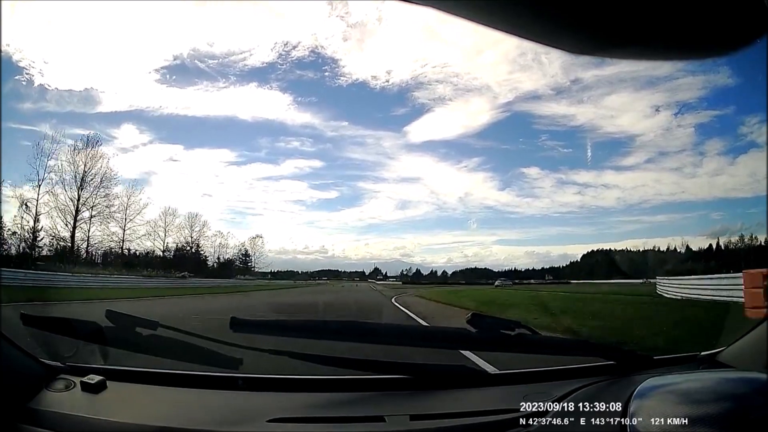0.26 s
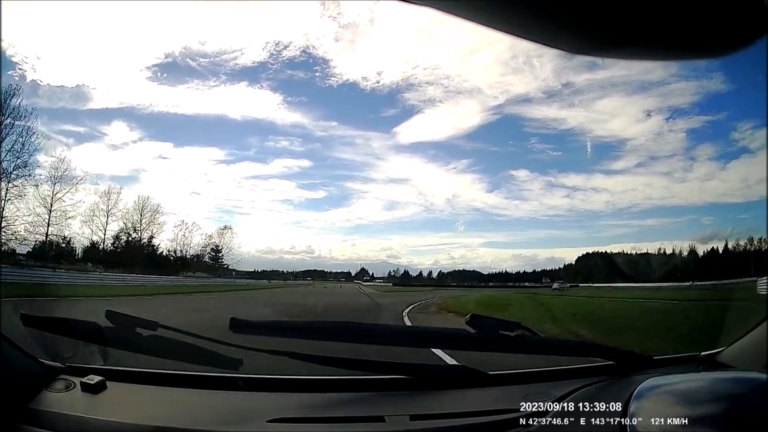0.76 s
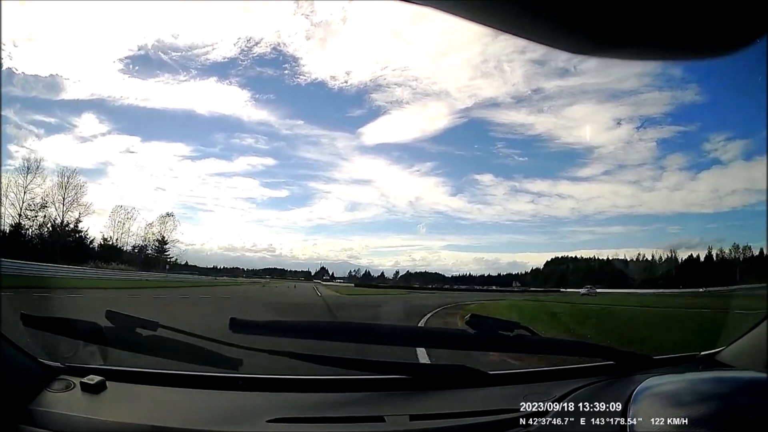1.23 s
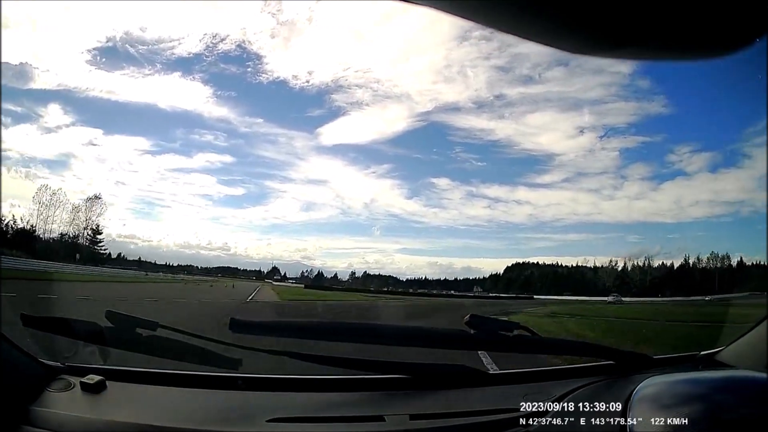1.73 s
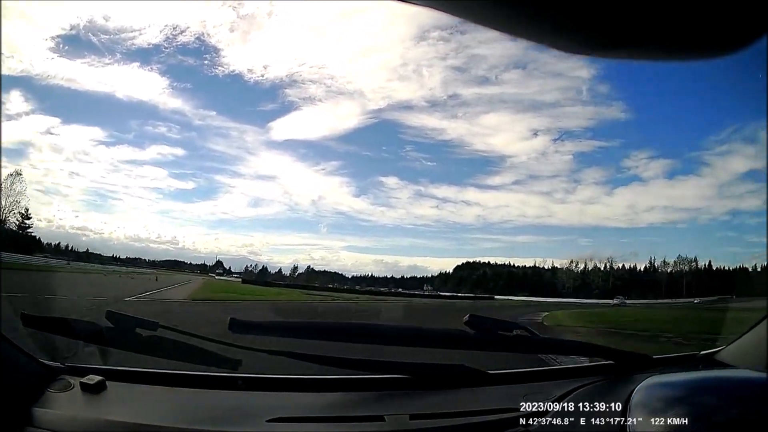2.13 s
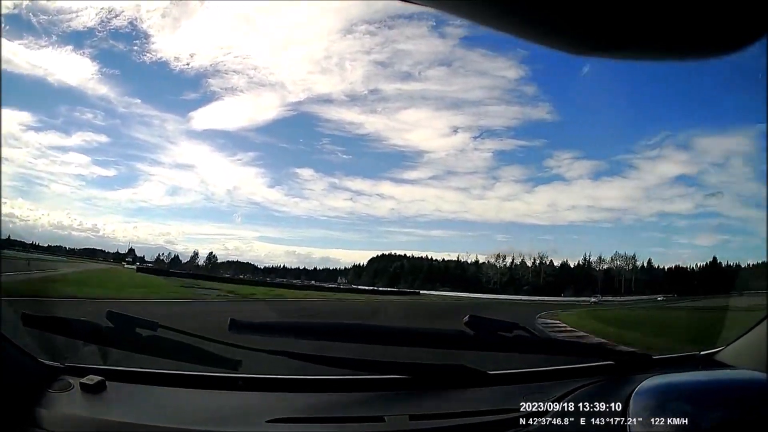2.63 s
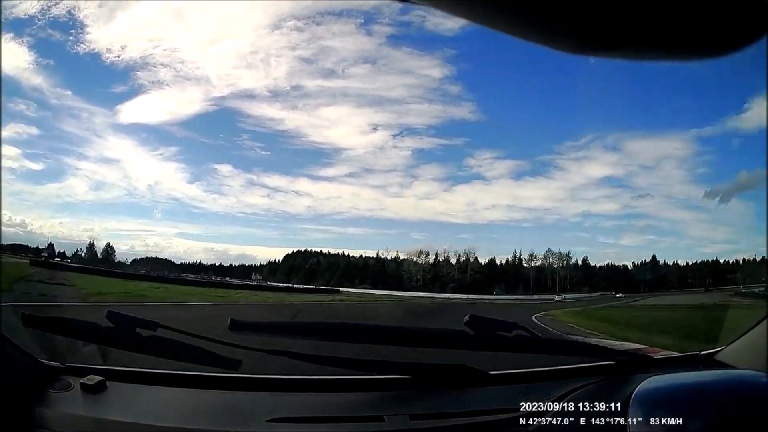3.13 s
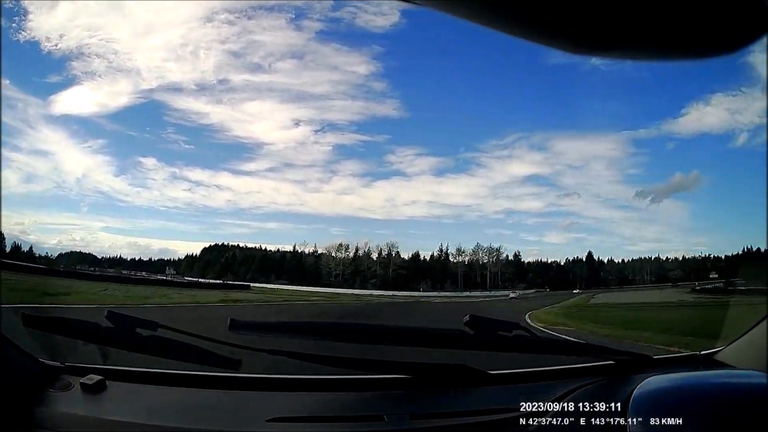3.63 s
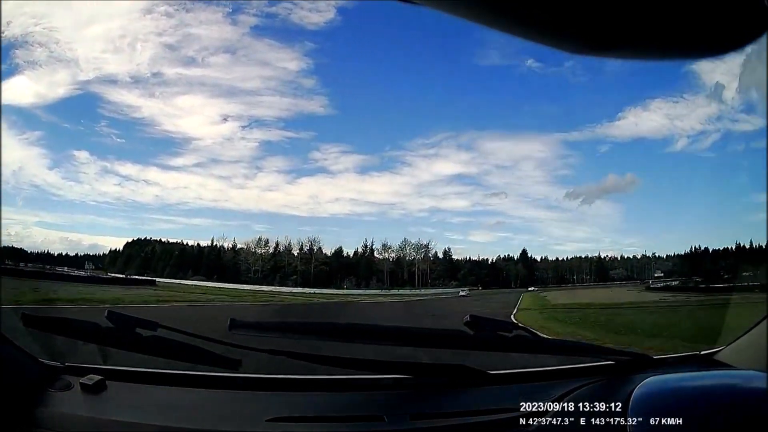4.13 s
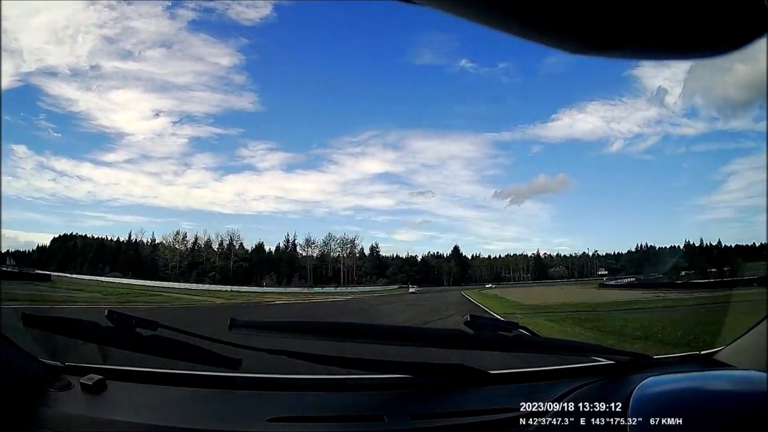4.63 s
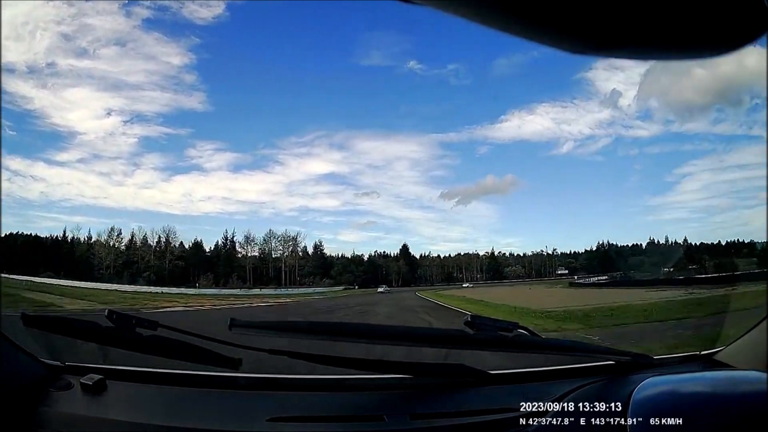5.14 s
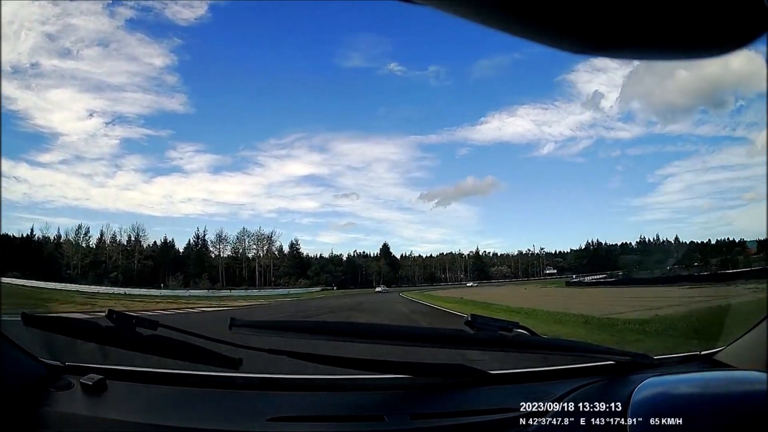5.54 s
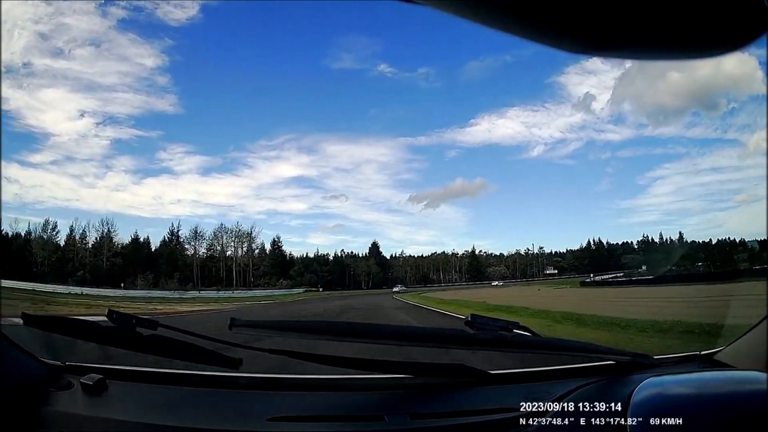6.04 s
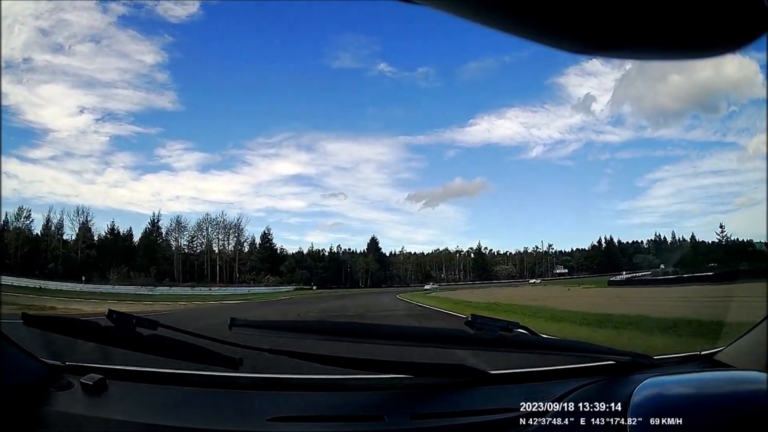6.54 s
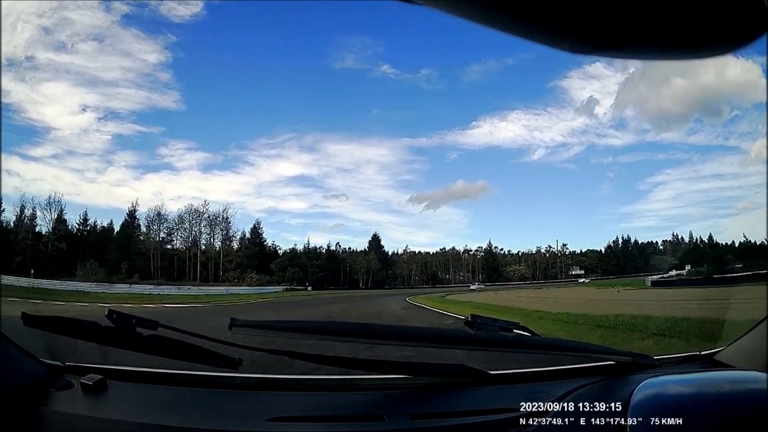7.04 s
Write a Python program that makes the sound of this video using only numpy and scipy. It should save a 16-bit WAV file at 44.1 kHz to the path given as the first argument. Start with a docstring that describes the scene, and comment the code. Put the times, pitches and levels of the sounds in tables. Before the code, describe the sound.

Heavy road rumble and rattling plastic shake a car cabin while an indicator ticks, then a four-cylinder engine growls and climbs smoothly under throttle.

```python
"""Car braking into a bend

Inside a four-cylinder car on rough tarmac as it brakes into a bend and pulls away, heard by a dash camera's microphone.
Bumps boom, the tyres drone and hiss, trim rattles and loose things knock: shaped noise, decaying blows and rung modes.
Engine orders, sines on the crankshaft, rise through body resonances; a gear whines, the indicator relay ticks.
The camera clips, and its crude rate conversion mirrors the bass into the treble."""
import sys
import numpy as np
from scipy.fft import rfft, irfft, next_fast_len
from scipy.io import wavfile
from scipy.ndimage import map_coordinates

SR = 44100
rng = np.random.default_rng(int(sys.argv[2]) if len(sys.argv) > 2 else 0)


def dump_mix(stems):
    """Bounce the given channels to the path in sys.argv[1] as a 16-bit WAV at rate SR."""
    frames = np.atleast_2d(stems).T  # one column per channel
    limited = np.clip(frames, -1, 1)  # hard clip at full scale
    pcm = np.round(limited * 32767).astype(np.int16)
    wavfile.write(sys.argv[1], SR, pcm)


N = 321048


def amp(db):
    """Gain of a level in dB."""
    return 10 ** (np.asarray(db) / 20)


def unit(x):
    """Scaled to rms 1."""
    return x / np.sqrt(np.mean(x ** 2) + 1e-20)


def curves(rows):
    """One value per sample for each column after the time."""
    s, *cols = np.transpose(rows)
    return [np.interp(np.arange(N) / SR, s, c) for c in cols]


def fade(rows, seconds):
    """Gain 1 over the time span of a table, falling to 0 outside it."""
    t = np.arange(N) / SR
    return np.clip(np.minimum(t - rows[0][0], rows[-1][0] - t) / seconds + 1, 0, 1)


def wobble(rate):
    """A smooth random curve, rate knots a second."""
    knots = rng.standard_normal(int(N * rate / SR) + 4)
    return map_coordinates(knots, [np.arange(N) * rate / SR])


def filtered(x, response):
    """x times a complex response of frequency, with half a second of padding."""
    m = next_fast_len(N + SR // 2)
    return irfft(rfft(x, m) * response(np.fft.rfftfreq(m, 1 / SR)), m)[:N]


def resonances(modes):
    """Causal response of (f/Hz, width/Hz, gain/dB) modes, alternating in sign."""
    def response(f):
        return sum((-1) ** k * amp(db) * 1j * f * w / (c * c - f * f + 1j * f * w)
                   for k, (c, w, db) in enumerate(modes))
    return response


def noise(spectrum):
    """Noise of rms 1 coloured by (f/Hz, level/dB) points on a log-frequency axis."""
    f, db = np.transpose(spectrum)
    colour = lambda hz: amp(np.interp(np.log(hz + 1), np.log(f + 1), db))
    return unit(filtered(rng.standard_normal(N), colour))


def resonant_noise(modes):
    """Noise of rms 1 through modes applied twice, for steep skirts."""
    return unit(filtered(rng.standard_normal(N), lambda f: resonances(modes)(f) ** 2))


def glide(rows, flutter_db, rate):
    """A gliding, fluttering sine from rows (t/s, f/Hz, level/dB)."""
    hz, db = curves(rows)
    level = fade(rows, 0.048) * np.sqrt(2) * amp(db + flutter_db * wobble(rate))
    return level * np.sin(2 * np.pi * np.cumsum(hz) / SR)


def ringing(s, gains_db, hz, t60):
    """Damped modes struck at time s, with a soft onset."""
    out, t = np.zeros(N + SR), np.arange(SR // 8)[:, None] / SR
    rings = amp(gains_db - 60 * t / t60) * np.sin(2 * np.pi * hz * t) * (1 - np.exp(-t / 0.00057))
    out[round(s * SR):][:len(t)] = rings.sum(1)
    return out[:N]


def engine():
    """Sines on the crankshaft follow the load and cross body and cabin resonances; valve gear ticks per firing."""
    # throttle: t/s, level/dB under full load
    load = [(3.4, -10), (3.7, -4), (4.3, -2.5), (4.8, 0), (5.6, -0.5), (6.35, -1.5), (6.6, -5.5),
            (7.28, -22.5)]
    # engine speed: t/s, firings a second
    speed = [(3.2, 83.5), (3.7, 84.9), (4.1, 86.1), (4.5, 88.3), (4.9, 91.2), (5.3, 94.8), (5.7, 98.7),
             (6.1, 102.8), (6.5, 106.5), (6.9, 109.6), (7.28, 111.5)]
    # orders that cross strong body modes: shaft multiples
    strong_orders = [2, 4, 8, 10, 11.5]
    # body modes of each strong order: f/Hz, width/Hz a pass, peak level/dB rms at full load
    body_modes = [
        [(97.4, 27.6, -9)],
        [(185.7, 16.4, -17.5), (205, 20, -28)],
        [(361.5, 21, -22.5), (394, 16.5, -21.5), (419, 34, -27.5)],
        [(434, 33, -18.5), (466, 40, -26.5), (535, 30, -28)],
        [(532.2, 33, -25), (564, 39, -31.5)],
    ]
    # lesser orders: shaft multiple, relative level/dB
    lesser_orders = [(1, 6), (2.5, 4), (3, 5), (5.5, 3.5), (6, -1.5), (6.5, -26.5), (9, -11.5), (9.5, -8),
                     (10.5, -11), (11, -18.5), (12, -11), (12.5, -13), (13, -8.5), (13.5, -18), (18, -15)]
    # cabin resonances: f/Hz, width/Hz, gain/dB
    cabin = [(120, 16, -6.5), (318.5, 64, -4), (452, 110, 2.5), (539.7, 76, 4), (990, 68, 3)]
    # valve-gear ticks: t/s, relative level/dB
    ticking = [(3.8, -69.5), (4.4, -36.5), (5.2, -35.5), (5.7, -46), (6.4, -51), (6.6, -63)]
    # tick strength in firing order: relative level/dB
    cylinder_db = [-7.5, -11.5, -16.5, -9]
    # bands that colour the ticks, each applied twice: f/Hz, width/Hz a pass, gain/dB a pass
    tick_bands = [(2290, 880, 6), (3370, 2800, 0.5), (4780, 300, 3)]

    load_db, = curves(load)
    rate, = curves(speed)
    firings = np.cumsum(rate) / SR
    shaft = np.pi * firings  # two firings a turn
    on = fade(load, 0.11)

    def order(k, db):
        return np.sqrt(2) * amp(db) * np.sin(k * shaft + rng.uniform(0, 2 * np.pi))

    def swell(modes, f):  # powers add; half the dB, as each mode counts twice
        return np.sqrt(sum(np.abs(resonances([(hz, w, db / 2)])(f)) ** 4 for hz, w, db in modes))

    strong = sum(swell(modes, k * rate / 2) * order(k, load_db + 0.73 * wobble(12))
                 for k, modes in zip(strong_orders, body_modes))
    lesser = sum(order(k, db + 2 * wobble(3.02)) for k, db in lesser_orders)
    lesser = filtered(on * amp(-24 + 1.42 * load_db) * lesser, resonances(cabin))

    count = firings.astype(int)
    uneven_db = 2 * rng.standard_normal(count[-1] + 1)[count]
    size_db = np.take(cylinder_db, count % len(cylinder_db)) + uneven_db
    decay_db = -38 * (firings - count)  # a burst dying within each firing
    ticks = amp(curves(ticking)[0] + size_db + decay_db) * np.sign(rng.standard_normal(N))
    ticks = filtered(on * amp(12.5) * ticks, lambda f: resonances(tick_bands)(f) ** 2)
    return on * strong + lesser + ticks


def gear_whine():
    """Meshing gear teeth give one rising, fluttering tone."""
    # gear mesh: t/s, f/Hz, level/dB
    mesh = [(5.42, 2274, -53.5), (5.67, 2326, -51), (6.0, 2398, -51), (6.36, 2475, -52)]
    return glide(mesh, flutter_db=1.2, rate=15)


def tyre_song():
    """A tyre sings briefly on one fluttering tone."""
    # singing tyre: t/s, f/Hz, level/dB
    song = [(1.24, 713, -40), (1.3, 707, -32), (1.38, 732, -33.5), (1.43, 720, -47)]
    return glide(song, flutter_db=3, rate=30)


def road():
    """Tarmac shakes suspension, floor pan and tyres and rings the body; air and tread hiss in ragged gusts."""
    # road: t/s, roughness/dB, hiss level/dB, tyre roar level/dB
    surface = [(0, -1.5, -31.5, -15), (0.4, -2, -34.5, -18), (1.2, -0.5, -35.5, -18),
               (1.8, -1.5, -37, -19.5), (2.2, 1.5, -36, -16), (2.43, 7, -30, -14), (2.6, 1.5, -34, -17),
               (3, -0.5, -34.5, -18), (3.1, -2.5, -39, -20.5), (3.4, -5.5, -40, -21), (4.2, -6, -40.5, -22),
               (4.8, -6.5, -38.5, -23), (5.5, -8.5, -38, -23.5), (6.1, -6, -38, -20.5),
               (6.6, -10, -39.5, -22), (7.28, -8, -39.5, -24.5)]
    # thud, then drone: level/dB on plain tarmac, dB per dB of roughness
    rumble_db = [(-16, .5), (-14, 1.1)]
    # suspension thud, tyre drone, tyre roar, hiss: f/Hz, relative level/dB per Hz
    thud = [(6, -14), (10, 0.5), (28, -3.5), (45, 1), (62, -2), (85, -32), (160, -120)]
    drone = [(35, -10), (60, -5), (80, -5.5), (129, 0.5), (156, -5.5), (188, -11.5), (210, -21.5),
             (230, -15.5), (300, -19.5), (510, -120)]
    roar = [(120, -3), (200, -11), (220, -10), (259, -8.5), (301, -6.5), (375, -7.5), (434, -16),
            (534, -16.5), (594, -19), (695, -21.5), (900, -25.5), (1170, -66.5), (1980, -120)]
    hiss = [(410, -37), (700, -5.5), (850, -3), (1100, -4.5), (2000, -16), (2600, -18.5), (3600, -28),
            (5000, -32), (6500, -36.5), (10000, -39), (15600, -40)]
    # tyres scrubbing at the turn-in: f/Hz, width/Hz a pass, relative level/dB
    scrub_modes = [(1020, 460, 0)]
    # that scrub over time: t/s, level/dB
    scrub_level = [(2.2, -42), (2.45, -36), (2.95, -39)]
    # floor pan, air in the tyres, cabin air, door panel:
    # f/Hz, width/Hz a pass, level/dB on plain tarmac, dB per dB of roughness
    panels = [(183, 27.4, -26.5, .5), (257, 13.5, -26.5, 1.5), (350, 157, -29.5, 0), (532, 34, -34, 0.3)]

    rough_db, hiss_db, roar_db = curves(surface)
    rumble = sum(amp(db + grows * rough_db) * noise(spectrum)
                 for (db, grows), spectrum in zip(rumble_db, (thud, drone)))
    tyres = amp(roar_db) * noise(roar)
    scrub = fade(scrub_level, .15) * amp(curves(scrub_level)[0]) * resonant_noise(scrub_modes)
    rings = sum(amp(db + grows * rough_db) * resonant_noise([(hz, width, 0)])
                for hz, width, db, grows in panels)
    ragged = amp(.7 * wobble(18) + 1.35 * wobble(90))
    return rumble + tyres + scrub + rings + amp(hiss_db) * unit(ragged * noise(hiss))


def bumps():
    """Each bump swells and dies on one body resonance."""
    # bumps: t/s, f/Hz, level/dB rms at the height, half-width/s
    hits = [(.04, 29.6, -5, 0.068), (.55, 125, -13, 0.028), (.59, 257, -16.5, 0.024), (.65, 30, -13, .03),
            (.66, 125.2, -13, 0.021), (.78, 33.25, -15.5, 0.05), (1.28, 29.83, -9, 0.022),
            (1.32, 124.7, -15, 0.05), (1.46, 28.04, -5, 0.05), (1.62, 183, -16.5, .03),
            (1.629, 257, -13.5, 0.04), (1.7, 125.4, -14, 0.035), (1.87, 532, -27.5, 0.027),
            (1.91, 33, -9.5, 0.044), (1.9, 126.2, -15.5, 0.047), (2.06, 40, -14.5, 0.025),
            (2.21, 28, -5, 0.046), (2.25, 183, -17.5, 0.043), (2.29, 125.2, -11, 0.031),
            (2.34, 257, -26, .03), (2.35, 28, -7, 0.061), (2.435, 125, -2.5, 0.022),
            (2.53, 34.74, -10.5, 0.027), (2.58, 257, -11, 0.024), (2.65, 545, -25.5, 0.076),
            (2.68, 257, -15.5, 0.026), (2.79, 554, -24, 0.027), (2.87, 257, -12, 0.023),
            (2.88, 30.16, -7.5, 0.071), (3.17, 45, -10, 0.045), (3.07, 123.5, -17, 0.03),
            (3.23, 135, -17.5, 0.059), (3.63, 130.6, -19, 0.053), (3.4, 535, -33.5, 0.11),
            (3.53, 183, -17.5, 0.046), (3.82, 183, -21, 0.052), (4.32, 31, -17, .04),
            (4.34, 183, -21.5, 0.057), (4.77, 40, -15, .06), (5.97, 32, -14, .06),
            (7.07, 32.13, -12.5, 0.039)]
    t = np.arange(N) / SR
    return sum(np.sqrt(2) * amp(db) * np.exp(-((t - s) / width) ** 2 / 2) * np.sin(2 * np.pi * (hz * t + turn))
               for (s, hz, db, width), turn in zip(hits, rng.random(len(hits))))


def trim():
    """A sharp contact and short chatter ring the plastic and crack in the treble; the dash crackles finely."""
    # rattles: t/s, relative level/dB, brightness/dB
    rattles = [(0.6065, -14.5, -16), (0.653, -13.5, -17.5), (0.676, -14, -19), (0.702, -17.5, -19),
               (0.9648, -20, -22), (1.0201, -28.5, -17), (1.064, -33, -20), (1.2, -26, -21.5),
               (1.442, -25, -22), (1.4678, -20, -18), (1.527, -19.5, -33), (1.629, -17.5, -19.5),
               (1.9015, -16, -16.5), (1.924, -14.5, -18), (2.058, -26, -14), (2.1172, -18, -17),
               (2.1767, -20.5, -12.5), (2.1854, -24, -14), (2.195, -12, -21), (2.2189, -14.5, -18),
               (2.2254, -21, -24), (2.2573, -26, -19), (2.274, -23, -20), (2.3012, -27.5, -13),
               (2.3226, -14.5, -11.5), (2.348, -28, -10), (2.3716, -20, -16.5), (2.393, -17, -18),
               (2.3997, -14.5, -18.5), (2.4262, -12, -25), (2.4114, -21, -19), (2.4373, -22.5, -18),
               (2.4464, -24.5, -9.5), (2.4594, -21, -25), (2.4877, -21.5, -16), (2.6574, -20, -28),
               (2.764, -28, -20), (2.7836, -25.5, -10.5), (2.8036, -15, -11.5), (2.824, -18, -22),
               (2.8426, -15.5, -18), (2.8627, -13.5, -16), (2.8832, -18, -12), (2.8963, -22, -20),
               (2.931, -16.5, -16.5), (2.9517, -13, -16), (3.0007, -24, -14.5), (3.0225, -30, -19),
               (3.043, -30, -22), (3.1464, -19.5, -20), (3.1669, -19.5, -17), (3.1865, -18, -21),
               (3.2094, -29, -22), (5.227, -30, -25), (5.684, -31, -26), (5.8845, -33, -17.5),
               (6.0347, -25.5, -28)]
    # plastic ring: f/Hz, width/Hz, gain/dB
    plastic = [(1520, 390, 0.5), (2960, 400, 1), (3990, 480, -0.5), (4770, 890, -3.5), (7840, 1500, -14.5)]
    # fine crackle fading as the car slows: t/s, level/dB
    crackle_level = [(0, -47.5), (1.2, -50.5), (2.4, -55), (2.7, -65), (3.4, -63.5), (7.28, -65.5)]
    # dash that crackles: f/Hz, width/Hz, relative gain/dB
    dash = [(2940, 1180, 7), (4530, 900, -6)]

    body, crack, t = np.zeros(N + SR), np.zeros(N + SR), np.arange(SR // 12) / SR
    for s, db, bright_db in rattles:
        bounces_db = 4 * rng.standard_normal(len(t) // 40 + 1).repeat(40)[:len(t)]
        chatter = amp(bounces_db - 60 * t / 0.052) * rng.standard_normal(len(t))
        contact = (t == 0) * rng.choice([-1, 1])  # one sharp blow
        start = round(s * SR)
        body[start:][:len(t)] += amp(db + 6.5) * (amp(8.5) * contact + amp(-11.5) * chatter)
        crack[start:][:len(t)] += amp(db + bright_db + 10) * (amp(9.0) * contact + amp(-14.5) * chatter)
    treble = lambda f: (1j * f / 5500 / (1 + 1j * f / 5500)) ** 2  # high-pass

    grain_sizes = amp(2.5 * rng.exponential(size=N)) * np.sign(rng.standard_normal(N))
    grains = (rng.random(N) < 900 / SR) * grain_sizes  # about 900 a second
    crackle = amp(curves(crackle_level)[0]) * unit(filtered(grains, resonances(dash)))
    return filtered(body[:N], resonances(plastic)) + filtered(crack[:N], treble) + crackle


def shrill_noise():
    """Brief narrow bands of fluttering noise near 3 to 5 kHz."""
    # bursts: start t/s, length/s, level/dB
    shrill_bursts = [(2.897, 0.027, -36.5), (2.962, 0.026, -33.5), (2.999, .004, -36.5)]
    # bands: f/Hz, width/Hz a pass, relative level/dB
    shrill_bands = [(2740, 110, -14), (3140, 200, -0.5), (3960, 81, -0.5), (4330, 170, -2),
                    (5330, 99, -1.5)]
    level = sum(amp(db) * fade([[s], [s + length]], 0.012) ** 2 for s, length, db in shrill_bursts)
    return level * amp(2.0 * wobble(110)) * resonant_noise(shrill_bands)


def loose_object():
    """Loose things in the cabin knock with short hollow notes."""
    # knocks: t/s, level/dB, f/Hz
    knocks = [(.948, -10, 790), (0.966, -16, 2300), (2.581, -27, 2920), (2.597, -25, 2900),
              (5.314, -34, 2500), (5.5199, -33, 2600), (5.6431, -34, 2600), (5.684, -35, 2600),
              (5.7239, -31, 2600), (5.8845, -30.5, 2600), (5.926, -38, 2710)]
    return sum(ringing(s, db, hz, t60=0.021) for s, db, hz in knocks)


def indicator():
    """The relay's damped modes ring: it closes with a low tock and opens with a thinner tick."""
    # relay modes: f/Hz, closing gain/dB, opening gain/dB, t60/s
    relay_modes = [(1700, -8, -30, 0.016), (1823, 3.5, -26, 0.03), (2000, -8, -35, .022),
                   (2044, 3.5, -24, 0.054), (2370, -20, -1.5, .025), (3400, -35, -1.5, 0.041),
                   (4000, -5.5, -12, 0.031), (4200, -11.5, -11, .018), (4370, -1.5, -2, 0.032),
                   (4680, -13.5, -4.5, 0.023), (5570, -12, -3, 0.022)]
    # closings: t/s, level/dB
    closings = [(0.5706, -33.5), (1.2481, -32.5), (1.946, -30.5), (2.6115, -29.5), (3.3014, -29.5),
                (3.9704, -31), (4.6503, -29), (5.3495, -30), (6.009, -31), (6.6961, -31.5)]
    # openings: t/s
    openings = [0.2528, 0.9123, 3.651, 4.31, 4.998, 5.6682, 6.348, 7.0479]
    hz, closing_db, opening_db, t60 = np.transpose(relay_modes)
    strike = lambda s, db: ringing(s, db + rng.normal(0, 1.5, len(hz)), hz, t60)
    tocks = sum(strike(s, db + closing_db) for s, db in closings)
    return tocks + sum(strike(s, -38.5 + opening_db) for s in openings)


def scene():
    """The whole cabin, summed in one channel."""
    tones = gear_whine() + tyre_song()
    cabin_noises = trim() + shrill_noise() + loose_object() + indicator()
    return (engine() + tones + road() + bumps() + cabin_noises)[None]


def record(dry):
    """The camera clips hard, then holds each converted sample until the next, mirroring bass into treble."""
    clip, top_hz = .97, 15760
    camera_rate, block = 32000, 1401  # samples a second in the camera; output samples per conversion block
    flat = np.clip(dry[0], -clip, clip)
    n = np.arange(N)
    late = (n % block * camera_rate / SR % 1) * SR / camera_rate  # age of the held sample, in output samples
    held = map_coordinates(flat, [n - late], mode="nearest")
    return filtered(held, lambda hz: hz < top_hz)[None]


dry = scene()
out = record(dry)
dump_mix(out)
```